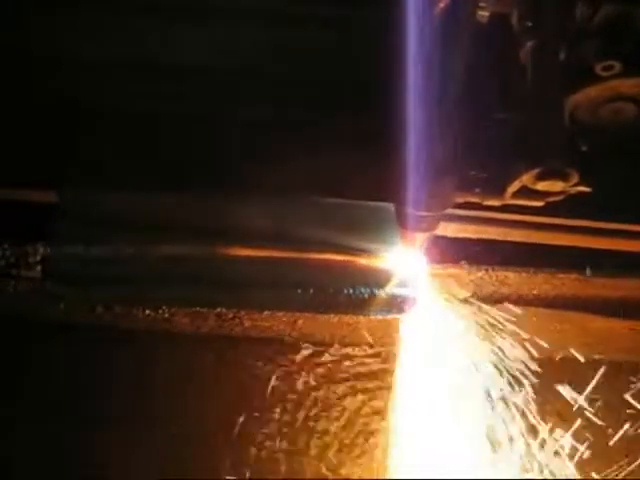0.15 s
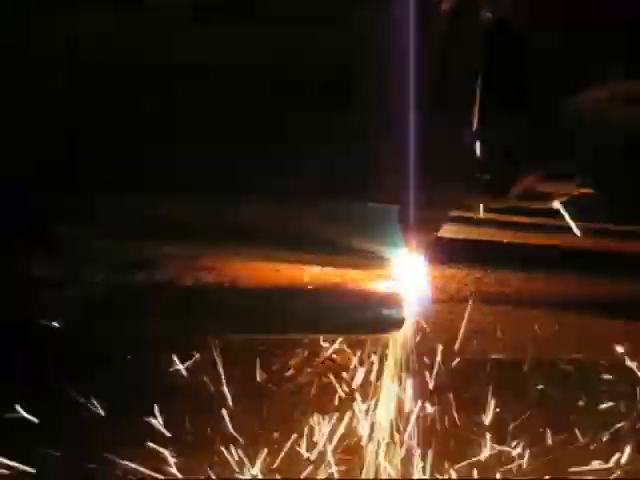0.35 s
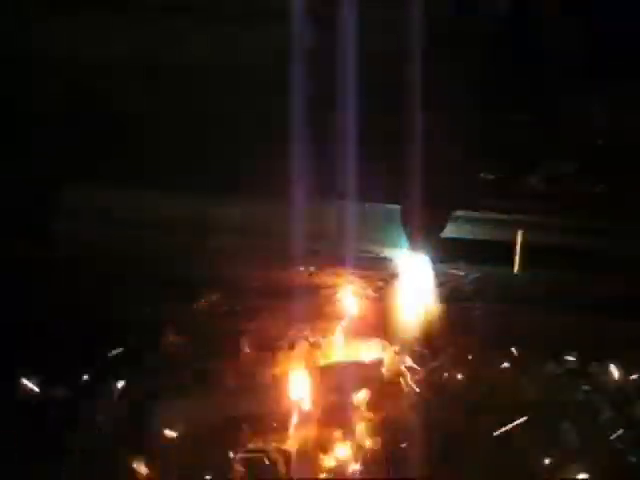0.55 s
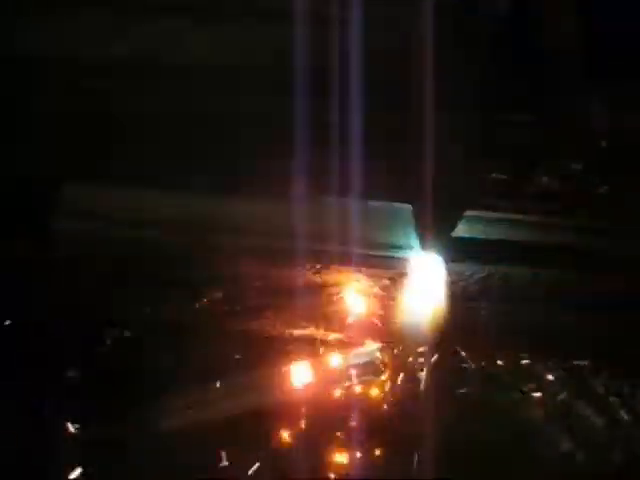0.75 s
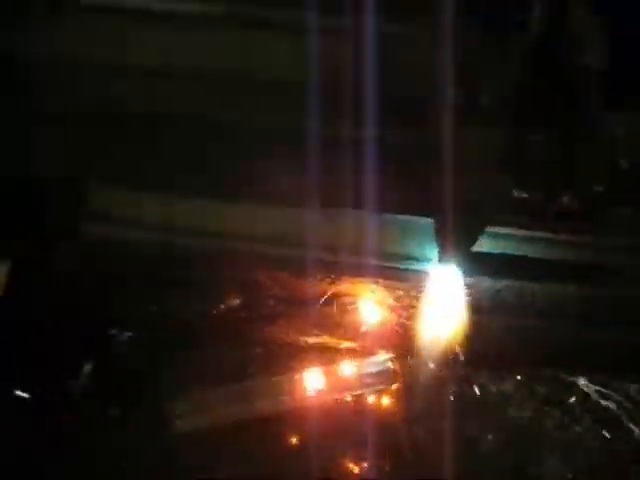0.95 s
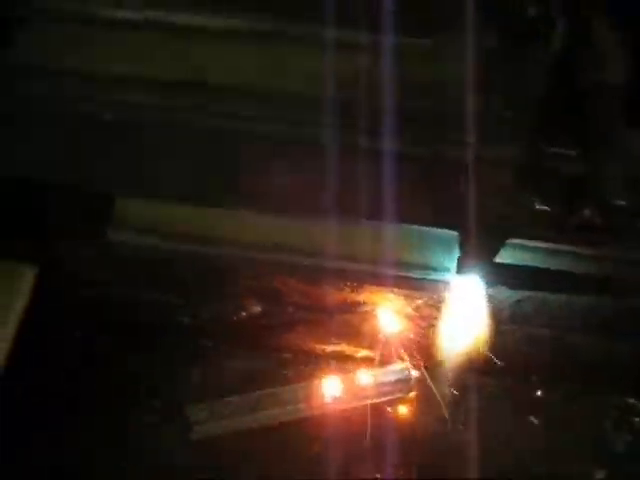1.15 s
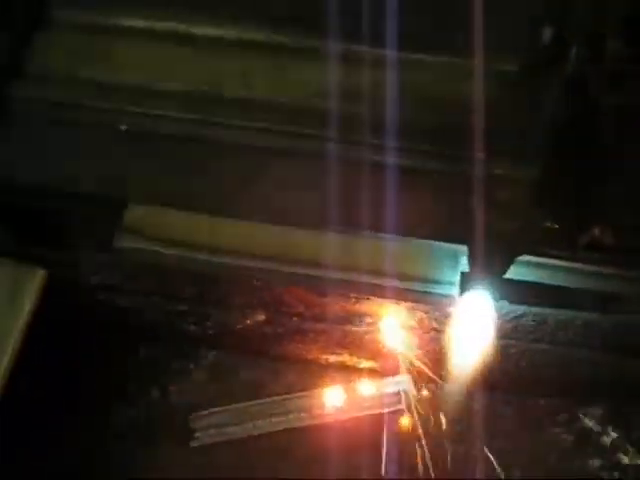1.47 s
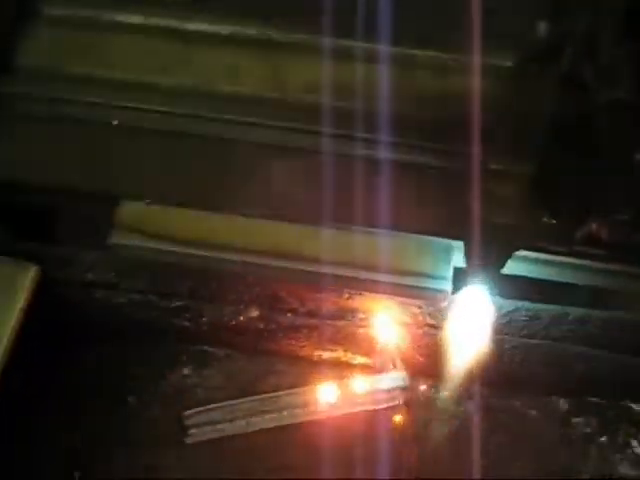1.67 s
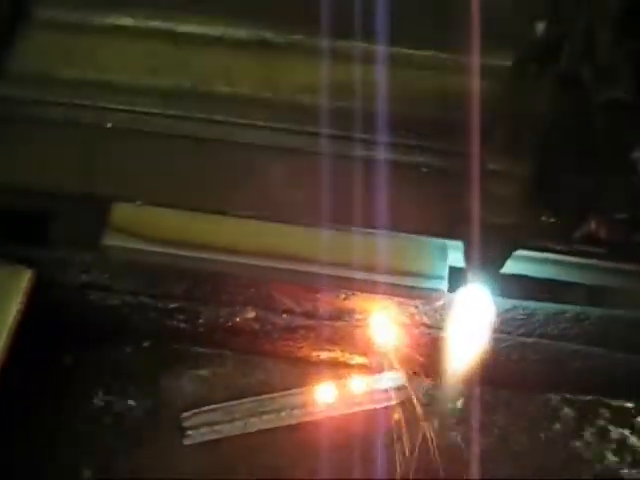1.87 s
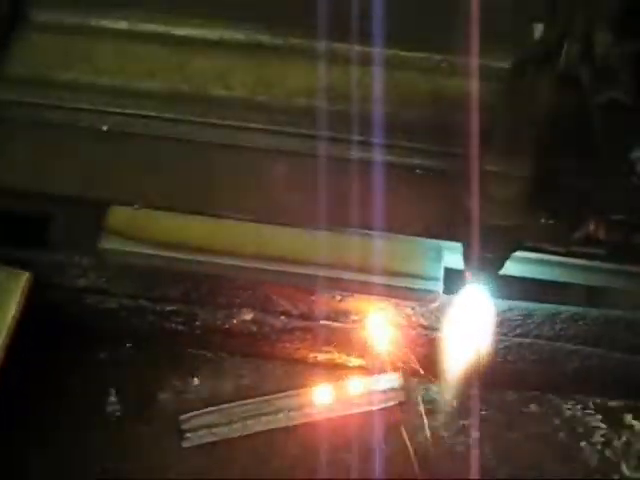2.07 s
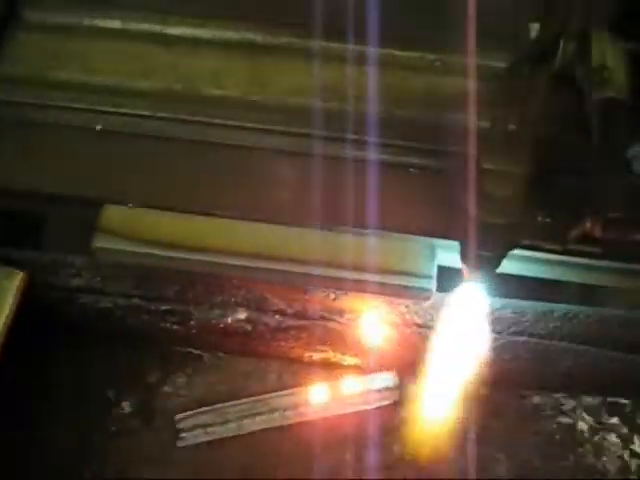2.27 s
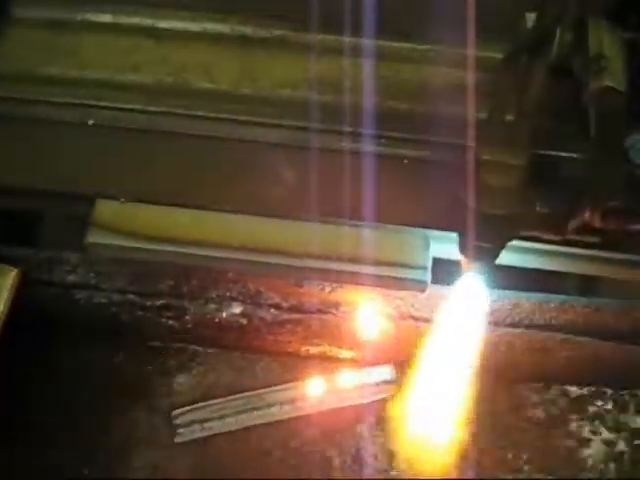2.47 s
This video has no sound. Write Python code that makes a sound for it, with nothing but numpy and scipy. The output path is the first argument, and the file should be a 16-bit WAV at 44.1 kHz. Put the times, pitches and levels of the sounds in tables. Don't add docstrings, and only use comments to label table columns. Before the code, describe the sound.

A cutting torch hisses loudly, a steel offcut clanks down, then the jet cuts to flame

```python
import sys
import numpy as np
from scipy import signal
from scipy.fft import rfft, irfft
from scipy.io import wavfile
from scipy.ndimage import uniform_filter1d

SR = 44100
rng = np.random.default_rng(int(sys.argv[2]) if len(sys.argv) > 2 else 0)


def voltage_ratio(level):
    return 10 ** (np.asarray(level, float) / 20)


def transcribe(signal):
    frames = np.atleast_2d(signal).T
    limited = np.clip(frames, -1, 1)
    pcm = np.round(limited * 32767).astype(np.int16)
    wavfile.write(sys.argv[1], SR, pcm)


N = 114660


def level(x, db):
    return x * voltage_ratio(db) / np.sqrt(np.mean(x ** 2))


def ramp(t, at_s, len_s):
    return .5 - .5 * np.cos(np.pi * np.clip((t - at_s) / len_s, 0, 1))


def walk(rate_hz):
    hold = int(SR / rate_hz)
    steps = np.repeat(rng.standard_normal(N // hold + 1), hold)
    return uniform_filter1d(uniform_filter1d(steps, hold), hold)[:N]


def ring(x, f_hz, t60_s):
    pole = np.exp(2j * np.pi * f_hz / SR - np.log(1000) / (t60_s * SR))
    return signal.lfilter([1], [1, -pole], x).imag


def turbulence(spectrum, peaks, gust_db, flicker_db, rate_hz, grain_db):
    f_hz = np.arange(N // 2 + 1) * SR / N + 1
    point_hz, point_db = np.array(spectrum).T
    shape_db = np.interp(np.log(f_hz), np.log(point_hz), point_db)
    shape_db = shape_db - 12 * np.clip(np.log2(point_hz[0] / f_hz), 0, 9)
    for centre_hz, width_hz, lift_db in peaks:
        shape_db = shape_db + lift_db / (1 + (2 * (f_hz - centre_hz) / width_hz) ** 2)
    eddies = rng.standard_normal(N) * voltage_ratio(grain_db * walk(400))
    bins = rfft(eddies) * voltage_ratio(shape_db)
    place = 4 * np.log2(f_hz / 40)
    gust = gust_db * walk(rate_hz)
    last, out = walk(rate_hz), 0
    for k in range(36):
        own = walk(rate_hz)
        overlap = np.cos(np.pi / 2 * np.clip(place - k, -1, 1)) ** 2
        out = out + irfft(bins * overlap, N) * voltage_ratio(gust + flicker_db * (own + last))
        last = own
    return level(out, 0)


def whistles(t):
    # f/Hz, width/Hz, level against the jet/dB
    tones = [(3646, 160, -15), (4358, 194, -14.5), (7880, 1700, -14.5), (6070, 770, -17.5)]
    # t/s, 1st and 3rd whistle level/dB, 2nd and 4th whistle level/dB
    tilt = [(0, -9, -1.5), (.25, -8, -1), (.45, -3, -11), (.6, -0.5, -15), (.9, 1, -6), (1.05, -6, -14),
            (1.2, -5, -13), (1.4, -3, -1), (1.6, 0, 3.5), (1.8, -4, 1.5), (2.0, 0, 4), (2.25, -5, 1)]
    tilt_s, odd_db, even_db = np.array(tilt).T
    out = 0
    for tilt_db, (f_hz, width_hz, db) in zip((odd_db, even_db) * 2, tones):
        t60_s = 1.4 / width_hz
        breath = ring(ring(rng.standard_normal(N), f_hz, t60_s), f_hz, t60_s)
        patchy_db = 4 * walk(16)
        out = out + level(breath, db) * voltage_ratio(np.interp(t, tilt_s, tilt_db) + patchy_db)
    return out


def jet(t):
    # t/s, level/dB
    pressure = [(0, -23), (.09, -21), (.16, -18), (.26, -20.5), (.36, -18.5), (.5, -20), (.7, -20),
                (.9, -19), (1.1, -19.5), (1.3, -19), (1.55, -20.5), (1.8, -19), (2.0, -21), (2.22, -20)]
    # f/Hz, level per Hz/dB
    kerf_spectrum = [(240, -60), (400, -18.5), (834, -15), (2090, -1.5), (2400, -8.5), (3060, -2),
                     (4290, -3.5), (10100, -2), (15500, -11.5)]
    # f/Hz, width/Hz, lift/dB
    kerf_peaks = [(2400, 210, 10.5), (4100, 470, 3.5), (6680, 300, 3.5), (8070, 770, 2.5), (796, 72, 6)]
    # f/Hz, level per Hz/dB
    free_spectrum = [(240, -60), (400, -19.5), (1220, -11.5), (1590, -10.5), (1910, -4), (2790, -7.5),
                     (3620, -2.5), (11100, -7.5), (15500, -17.5)]
    # f/Hz, width/Hz, lift/dB
    free_peaks = [(1234, 92, 6), (2426, 210, 3), (3660, 170, 2.5), (4650, 140, 0), (4880, 1000, -3),
                  (6300, 1300, 0.5)]
    kerf = turbulence(kerf_spectrum, kerf_peaks, gust_db=1.3, flicker_db=1.0, rate_hz=35.8, grain_db=1.0)
    blow = turbulence(free_spectrum, free_peaks, gust_db=.14, flicker_db=.86, rate_hz=42, grain_db=.8)
    free = ramp(t, at_s=.42, len_s=.12)
    gas = np.sqrt(1 - free) * kerf + np.sqrt(free) * blow + whistles(t)
    lever_s, valve_s = 2.23, .023
    shut_db = -20 * ramp(t, lever_s, 4 * valve_s)
    pressure_s, pressure_db = np.array(pressure).T
    return gas * voltage_ratio(np.interp(t, pressure_s, pressure_db) + shut_db)


def shop():
    # f/Hz, level per Hz/dB
    flame_spectrum = [(40, -51), (120, -15.5), (230, -10), (900, -5), (2600, -6.5), (5000, -8.5),
                      (10500, -8), (15500, -16)]
    # f/Hz, width/Hz, lift/dB
    flame_peaks = [(313, 85, 7.5), (450, 250, -9), (760, 27, 3.5), (885, 160, 3.5), (1474, 130, 6.5),
                   (1805, 22, 7.5), (3390, 430, 3.5)]
    # f/Hz, width/Hz, level/dB
    hum = [(62.4, 6.5, -85), (73.3, 5.8, -62.5), (127, 4, -81)]
    flame = turbulence(flame_spectrum, flame_peaks, gust_db=.4, flicker_db=.3, rate_hz=55, grain_db=1.0)
    out = voltage_ratio(-31.5) * flame
    for f_hz, width_hz, db in hum:
        out = out + level(ring(rng.standard_normal(N), f_hz, 2.3 / width_hz), db)
    return out


def slag(t):
    # t/s, length/s, start f/Hz, end f/Hz, level/dB
    drops = [
        (1.03, 0.22, 8800, 7900, -32),
        (0.36, 0.053, 6700, 6700, -29),
    ]
    width_hz, out = 350, 0
    for at_s, len_s, from_hz, to_hz, db in drops:
        part = np.clip((t - at_s) / len_s, 0, 1)
        hiss = level(ring(rng.standard_normal(N), SR / 4, 2 / width_hz), db)
        cycles = np.cumsum(from_hz + (to_hz - from_hz) * part - SR / 4) / SR
        squeal = (signal.hilbert(hiss) * np.exp(2j * np.pi * cycles)).real
        out = out + np.sin(np.pi * part) * squeal
    return out


def offcut(t):
    # t/s, level/dB, best-ringing f/Hz, crack level/dB
    blows = [(.402, -19.5, 486, -12), (.425, -26, 450, -16), (.516, -10, 1500, -9), (.518, -13, 470, -7),
             (.525, -7.5, 750, -6.5), (.532, -18.5, 600, 0), (.535, -16.5, 1300, -18),
             (.541, -14.5, 450, -6), (.559, -24, 540, -1), (.588, -20.5, 480, -14), (.595, -19, 750, -10),
             (.612, -22, 382, -18), (.630, -18.5, 400, -17), (0.664, -32, 380, -16), (.68, -31, 400, -16),
             (0.714, -34, 450, -16), (1.125, -33, 330, -20), (2.05, -32, 320, -20)]
    # f/Hz, level/dB, t60/s
    modes = [(167, -1, 0.36), (324.1, -4.5, .4), (365.4, -7, 0.2), (407, 0.5, 0.13), (457, .5, 0.12),
             (542, -2.5, 0.11), (676, 0, 0.049), (768, 1.5, 0.028), (1150, 1, 0.084), (1424, 0.5, 0.057),
             (1704, 1.5, 0.061), (2220, -6, 0.041), (2930, -1, 0.054), (3850, -8, .05)]
    off_pitch_db = 6.5
    crack_gain_db, crack_t60_s, contact_s = 13, .07, .0013
    shop_db, shop_t60_s = -5, .47
    out = np.zeros(N)
    luck = rng.standard_normal((len(blows), len(modes), 2))
    for (at_s, db, best_hz, crack_db), row in zip(blows, luck):
        tap = np.zeros(N)
        tap[int(at_s * SR)] = voltage_ratio(db - 11)
        for (f_hz, mode_db, t60_s), (level_luck, pitch_luck) in zip(modes, row):
            gain_db = mode_db + .91 * level_luck - off_pitch_db * np.log2(f_hz / best_hz) ** 2
            mode = ring(tap, f_hz * (1 + .022 * pitch_luck), t60_s)
            out += np.sign(pitch_luck) * voltage_ratio(gain_db) * mode
        crack = ring(rng.standard_normal(N), 2000, .00059) / 3
        age_s = np.clip(t - at_s, 0, 9)
        attack = 1 - np.exp(-age_s / contact_s)
        out += crack * attack * voltage_ratio(db + crack_gain_db + crack_db - 60 * age_s / crack_t60_s)
    tail = rng.standard_normal(SR // 2) * voltage_ratio(-60 * t[:SR // 2] / shop_t60_s)
    tail = tail / np.sqrt(np.sum(tail ** 2))
    out = out + voltage_ratio(shop_db) * signal.fftconvolve(out, tail)[:N]
    return signal.sosfilt(signal.butter(3, [270, 8000], "band", fs=SR, output="sos"), out)


def scene():
    t = np.arange(N) / SR
    gain_db = 12.5 * ramp(t, at_s=2.258, len_s=.036)
    mono = jet(t) + shop() * voltage_ratio(gain_db) + slag(t) + offcut(t)
    return np.array([mono, mono])


def top_gaps(x):
    top = signal.sosfiltfilt(signal.butter(16, 15000, "high", fs=SR, output="sos"), x)
    gaps = 1. * (walk(rate_hz=30) > .2)
    return x - top * uniform_filter1d(gaps, size=200)


def side_noise(mono):
    chance, fill_db, width_share = .2, -2, .14
    side, n = np.zeros(N + 2048), np.arange(2048)
    window = signal.windows.kaiser_bessel_derived(2048, 4 * np.pi)
    for at, (luck, place) in zip(range(727, N - 2048, 1024), rng.random((N // 1024, 2))):
        if luck < chance:
            mid = 210 + 500 * place
            half = min(width_share * mid, 90) / 2
            k = np.arange(int(mid - half), int(min(mid + half, 730)))
            basis = window * np.cos(np.pi / 1024 * (n + 512.5) * (k[:, None] + .5))
            size = np.std(basis @ mono[at:at + 2048]) / 512
            side[at:at + 2048] += size * rng.standard_normal(len(k)) @ basis
    return voltage_ratio(fill_db) * side[:N]


def top_cut(x):
    return signal.sosfilt(signal.butter(12, 15740, fs=SR, output="sos"), x)


def record(dry):
    track = top_gaps(dry)
    mix = track + side_noise(track[0]) * np.array([[1], [-1]])
    return top_cut(mix)


dry = scene()
out = record(dry)
transcribe(out)
```